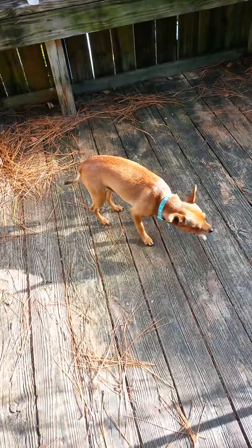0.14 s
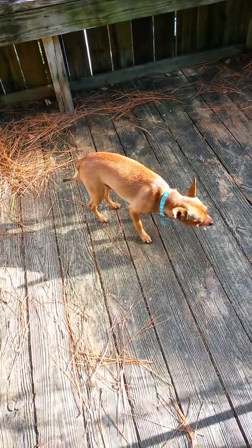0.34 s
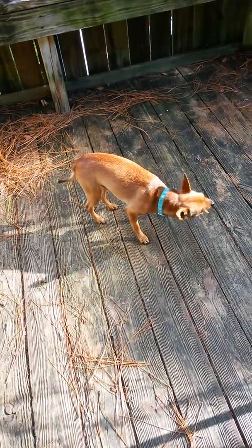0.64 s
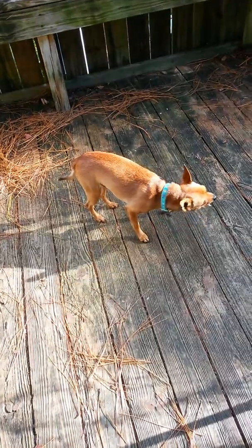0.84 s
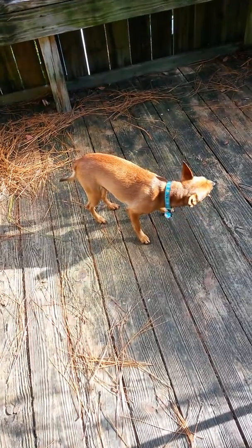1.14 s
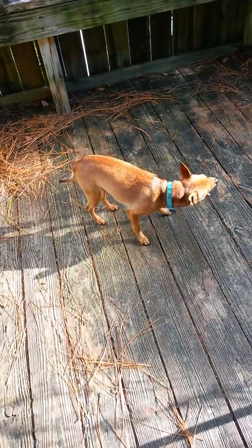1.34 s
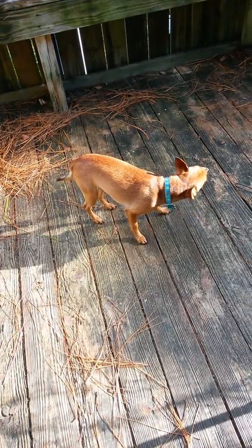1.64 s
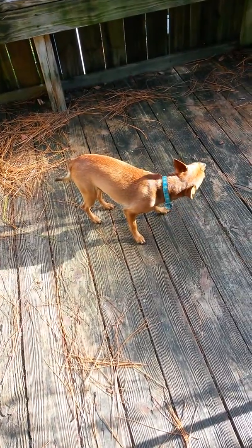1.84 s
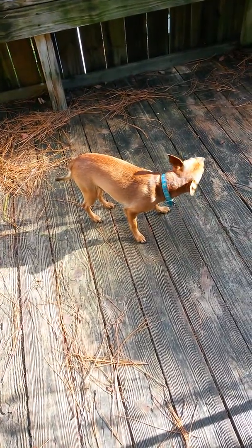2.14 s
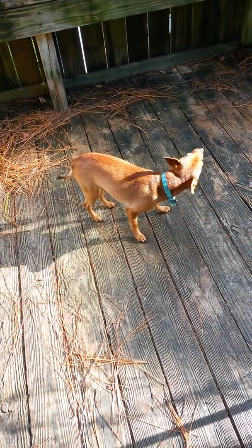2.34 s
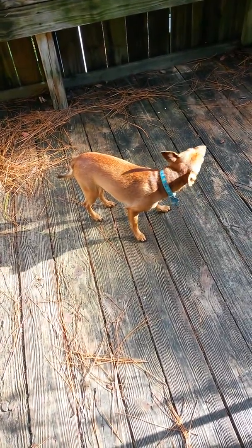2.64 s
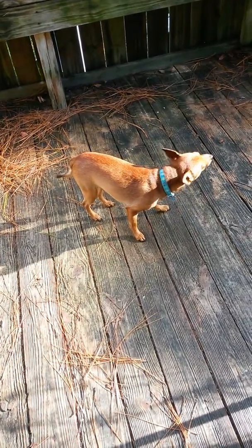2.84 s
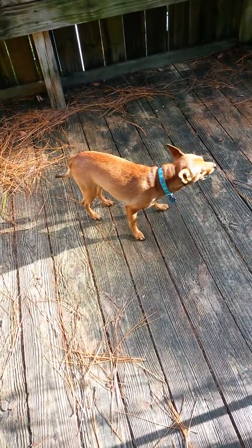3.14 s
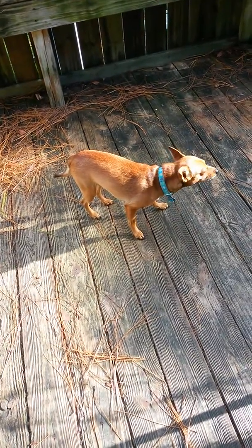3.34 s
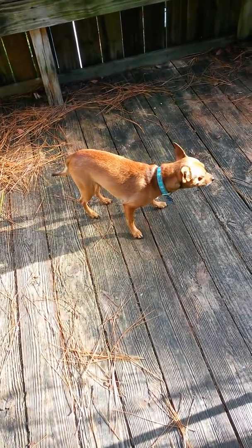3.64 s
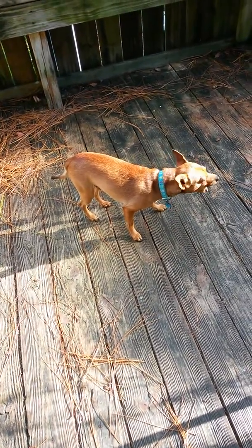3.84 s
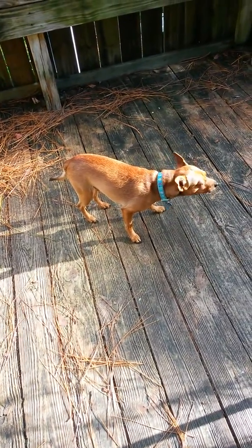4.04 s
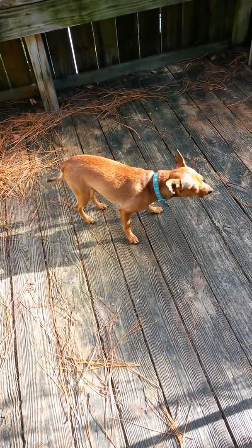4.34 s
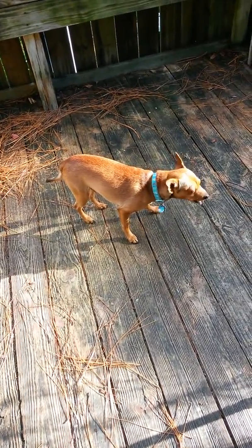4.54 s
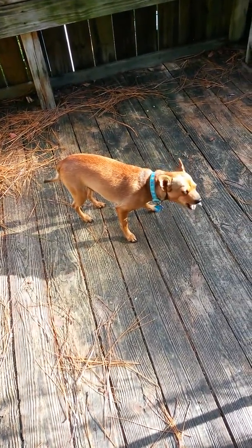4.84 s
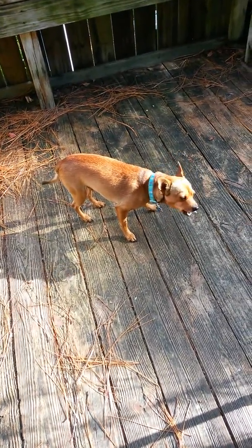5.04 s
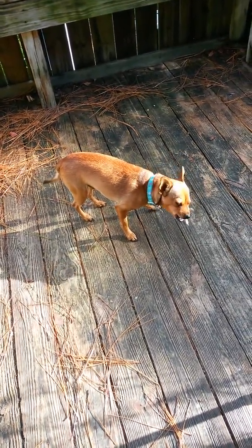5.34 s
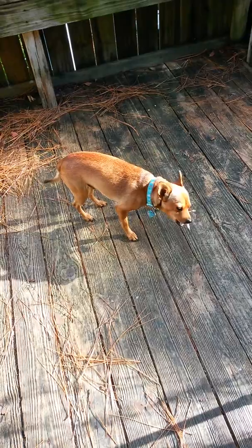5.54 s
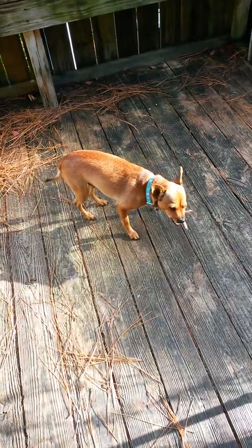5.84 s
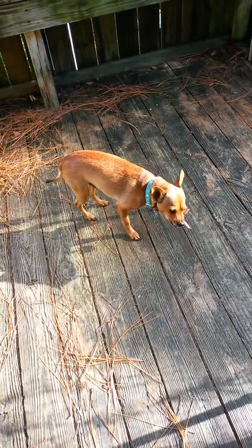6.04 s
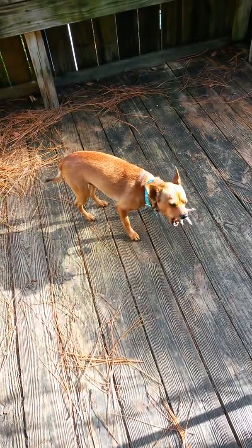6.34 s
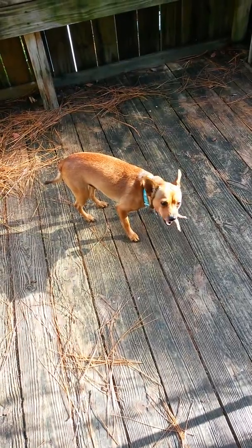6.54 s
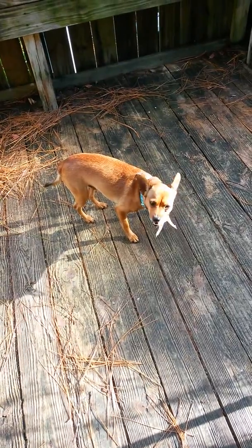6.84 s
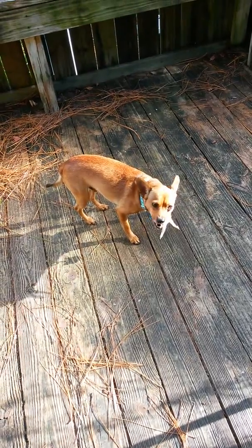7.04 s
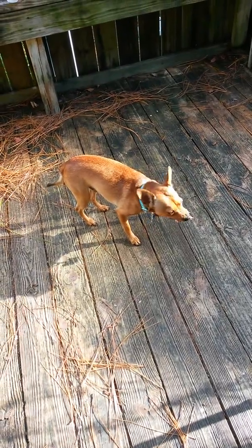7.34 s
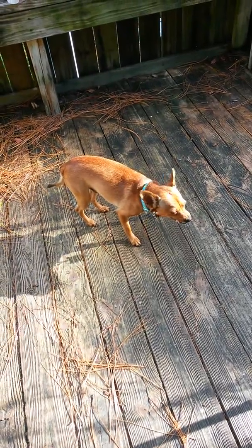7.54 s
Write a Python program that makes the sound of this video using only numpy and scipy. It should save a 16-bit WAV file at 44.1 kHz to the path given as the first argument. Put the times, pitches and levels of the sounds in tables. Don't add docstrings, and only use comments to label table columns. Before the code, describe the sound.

Sharp wet bone crunches and bright jingling collar tags from a small dog chewing outdoors, with a quiet stretch midway and faint wind rumble behind.

```python
import sys
import numpy as np
from scipy import signal
from scipy.fft import rfft, irfft, next_fast_len
from scipy.io import wavfile
from scipy.ndimage import uniform_filter1d, map_coordinates

SR = 44100
rng = np.random.default_rng(int(sys.argv[2]) if len(sys.argv) > 2 else 0)


def int16_out(signal):
    q = np.round(np.clip(np.atleast_2d(signal).T, -1, 1) * 32767)
    wavfile.write(sys.argv[1], SR, q.astype(np.int16))


def amplitude_ratio(level_db):
    exponent = np.asarray(level_db, float) / 20
    return 10 ** exponent


N = 339570

# t/s, f/Hz, level/dB
ENGINE_FIRING = [(0, 62.65, -51.5), (1.2, 62.5, -49.5), (1.35, 59.8, -52), (1.72, 58.9, -56),
                 (1.95, 62.5, -51.5), (2.66, 63.53, -50), (2.96, 64, -62), (3.26, 65.77, -53),
                 (3.67, 64.7, -57.5), (3.85, 62.8, -63), (4.07, 65.6, -57.5), (4.84, 65.24, -49.5),
                 (5.6, 65.4, -55), (6.65, 61.8, -58.5), (7.08, 63.2, -69), (7.7, 60.6, -76)]
# t/s, level/dB
ENGINE_LOAD = [(0, -61.5), (1.72, -57), (2.2, -63.5), (3.67, -73), (4.0, -76), (4.84, -68), (6.65, -58),
               (7.08, -53.5), (7.7, -63)]
# f/Hz, level/dB
MAINS_HUM = [(120, -60)]
# t/s, level/dB
WIND_LEVEL = [(0, -56), (1.05, -54), (1.99, -56.5), (2.57, -54.5), (2.87, -58.5), (3.55, -57),
              (3.85, -60.5), (4.2, -58), (4.6, -58), (5.04, -56), (5.92, -56.5), (6.1, -54), (6.2, -57.5),
              (6.7, -57), (6.91, -55.5), (7.7, -58)]
# f/Hz, density/dB per Hz
RUMBLE_SPECTRUM = [(18, -61), (30, -12), (41, -12.5), (64, 2), (91, 1), (108, -2), (140, -5.5), (187, -3.5),
                   (264, -4), (286, -9), (700, -20.5), (910, -66), (1540, -120)]
# f/Hz, density/dB per Hz
RUSTLE_SPECTRUM = [(240, -60), (400, -7), (495, -7), (660, -9), (780, -7.5), (880, -8.5), (2870, -18),
                   (5950, -19), (7580, -22.5), (13300, -22.5), (15000, -26)]
# f/Hz, correlation/1
PORT_LIKENESS = [(60, 0.92), (150, 0.95), (380, 0.62), (950, -0.22), (2380, 0.052), (5980, 0.0095),
                 (15000, 0.023)]
RUSTLE_DB, RUSTLE_FOLLOWS = -63, 0.82

# f/Hz, t60/s
FENCE_T60 = [(500, 0.031), (3000, 0.041), (12000, 0.031)]
# f/Hz, gain/dB
BODY_SHADOW = [(1000, 1), (2400, -1), (4400, -5), (8000, -11), (15000, -16)]
# f/Hz, lag/rad
BODY_LAG = [(0, 0), (1800, .8), (3100, 1.4), (5430, 6.5), (7150, 11.4), (9560, 19.7), (11900, 24.3),
            (16000, 33)]
# t/s, share/1
MUZZLE_TURN = [(0, 0), (5.9, 0), (5.93, 1), (7.4, 1), (7.44, 0), (7.7, 0)]
TURN_LAG_SAMPLES = 7

# f/Hz, level/dB, share of t60/1
THIN_MODES = [(11863, 0, 1.2), (12015, -3, .75)]
# f/Hz, level/dB, share of t60/1
THICK_MODES = [(10425, 0, 1.05), (10530, -6, .7), (8600, -18, .8)]
# f/Hz, level/dB, share of t60/1
SPLIT_RING_MODES = [(7300, 0, .6)]
# f/Hz, level/dB, share of t60/1
BUCKLE_MODES = [(13950, 0, .7), (8200, -5, .6)]
# t/s, click level/dB, thin level/dB, thick level/dB, t60/s
TAG_KNOCKS = [(.486, -22.5, -42.5, -46, 0.1), (.57, -40, -52, -52, .08), (.768, -42, -46.5, -47, 0.075),
              (0.9209, -24, -43, -56, 0.085), (.999, -30, -46, -43.5, 0.046), (1.127, -26.5, -47, -59, .1),
              (1.17, -25, -37.5, -48, 0.057), (1.311, -28, -41, -54, 0.086),
              (1.3885, -28, -44, -41.5, 0.057), (1.465, -38, -59, -56, .09), (1.606, -37, -44, -42, .042),
              (1.63, -29, -44, -42, .05), (2.0515, -29, -48, -62, 0.067), (2.3258, -31, -52, -48, 0.068),
              (2.3518, -30, -48, -49, 0.054), (2.967, -31, -44, -51, 0.079), (3.0, -30, -55, -62, 0.048),
              (3.381, -40, -53.5, -57, 0.11), (4.763, -33, -53, -47, 0.059), (5.0247, -30, -42, -50, 0.088),
              (5.0722, -28, -51, -40, .06), (6.912, -32, -47.5, -53, .09), (7.0205, -31, -57, -64, .1),
              (7.483, -31, -47.5, -60, 0.068)]
# t/s, click level/dB, ring level/dB
THIN_TAG_TAPS = [(.26, -55, -64), (.425, -55, -67), (.6565, -46, -47), (.735, -45, -50), (1.1464, -45, -49),
                 (1.35, -55, -59), (1.4385, -47, -55), (1.4845, -50, -55), (1.645, -50, -49),
                 (1.726, -42, -57), (1.79, -60, -70), (1.815, -60, -70), (1.84, -60, -71),
                 (1.9445, -54, -61), (2.1925, -51, -54), (2.556, -48, -51), (2.572, -57, -52),
                 (2.722, -39, -55), (2.9005, -54, -65), (3.368, -55, -65), (3.541, -39, -52),
                 (4.2745, -34, -51), (4.401, -55, -65), (4.9185, -35, -55.5), (5.1785, -35, -52),
                 (5.3446, -55, -59), (5.54, -60, -69), (5.5814, -50, -63), (5.5897, -55, -63),
                 (5.684, -60, -66), (5.705, -60, -66), (5.8511, -36, -57), (5.9364, -55, -59),
                 (5.9838, -55, -61), (6.802, -48, -49.5), (7.025, -55, -54), (7.04, -55, -52),
                 (7.1165, -59, -62), (7.2724, -54, -57), (7.3372, -47, -54), (7.52, -58, -59),
                 (7.5767, -50, -59), (7.692, -55, -58)]
# t/s, click level/dB, ring level/dB
BOTH_TAG_TAPS = [(.3087, -51, -60), (.37, -46, -60), (.4685, -45, -72), (2.466, -38, -63),
                 (2.5345, -40, -50), (2.608, -55, -65), (3.2502, -38, -61), (3.416, -33, -60),
                 (4.138, -37, -59.5), (5.097, -45, -55), (7.435, -62, -68)]
# t/s, click level/dB, ring level/dB
THICK_TAG_TAPS = [(.133, -28, -56), (.505, -55, -44), (.52, -55, -46), (.7008, -50, -62), (.9814, -44, -47),
                  (2.066, -48, -56), (5.0832, -44, -48), (5.3925, -45, -50), (5.4415, -51, -54),
                  (5.4755, -48, -52), (5.945, -60, -61), (5.975, -60, -58), (6.923, -55, -50),
                  (7.345, -60, -54), (7.413, -60, -62)]
# t/s, level/dB
SPLIT_RING_HITS = [
    (.487, -56),
    (.9215, -46.5),
    (1.127, -43.5),
    (1.312, -49),
    (1.607, -54),
    (2.327, -53),
    (2.967, -62),
    (3.381, -52.5),
    (5.0245, -42.5),
    (6.912, -56),
]
# t/s, level/dB
BUCKLE_KNOCKS = [
    (.333, -60),
    (1.4385, -55),
    (1.472, -53),
    (1.645, -63),
    (2.896, -55.5),
    (2.949, -61),
]
# start t/s, stop t/s, start level/dB
TAG_SINGING = [(0, .045, -83), (0.375, 0.49, -69), (0.473, 0.54, -68), (0.564, 0.61, -68),
               (0.656, 0.76, -53.5), (0.927, 0.994, -60.5), (1.007, 1.124, -59), (1.318, 1.384, -63),
               (1.388, 1.462, -56.5), (1.947, 2.062, -66), (2.195, 2.367, -74), (2.724, 2.819, -73),
               (3.244, 3.271, -72), (3.41, 3.471, -59), (3.543, 3.565, -67), (4.271, 4.341, -72),
               (4.92, 5.02, -70), (5.025, 5.12, -66), (5.174, 5.269, -72), (5.364, 5.439, -74),
               (5.444, 5.469, -66), (5.473, 5.533, -69), (5.85, 5.969, -67), (6.8, 6.905, -59.5),
               (7.018, 7.07, -63), (7.272, 7.335, -73), (7.336, 7.365, -65), (7.475, 7.541, -70)]
SING_HZ, SING_FADE_DB_PER_S = 7059, 76
TAP_T60_S = 0.069
SILENT_TAG_DB = -19
SMALL_CLICK_DB = 20.5

# t/s, peak level/dB, f/Hz
JAW_THUDS = [
    (6.0425, -38, 400),
    (2.1372, -40.5, 1070),
    (2.0345, -43, 1180),
    (6.797, -37.5, 2100),
    (5.487, -47.5, 1530),
    (2.569, -46.5, 1650),
]
# start t/s, stop t/s, level/dB, colour f/Hz
GRISTLE_GRINDS = [(0.278, 0.397, -63.5, 4960), (0.484, 0.55, -60, 4370), (0.568, 0.598, -61, 3020),
                  (0.602, 0.626, -58, 1830), (0.631, 0.65, -55, 2600), (0.674, 0.826, -57, 5000),
                  (0.911, 1.064, -60.5, 5000), (1.121, 1.247, -62, 4625), (1.374, 1.512, -60.5, 4970),
                  (1.527, 1.555, -57, 5000), (1.569, 1.644, -60.5, 4300), (1.657, 1.705, -55, 3620),
                  (2.05, 2.093, -59.5, 4540), (2.122, 2.155, -60, 4280), (2.317, 2.419, -63, 4626),
                  (2.561, 2.621, -61, 4700), (2.9, 3.035, -72, 3960), (3.367, 3.448, -67, 4650),
                  (3.982, 4.121, -68, 5000), (4.749, 4.859, -69, 4490), (5, 5.149, -63, 4250),
                  (5.299, 5.419, -62.5, 3950), (5.468, 5.526, -56, 4200), (5.539, 5.575, -62, 4270),
                  (5.599, 5.726, -67, 4540), (5.93, 6.14, -62.5, 4330), (6.454, 6.527, -61.5, 4510),
                  (6.779, 6.854, -60, 4490), (6.897, 7.042, -57.5, 3700), (7.096, 7.225, -65.5, 4340),
                  (7.457, 7.543, -58, 3265)]
FIZZ_DB_PER_OCTAVE = 12

# t/s, peak level/dB, mouth f/Hz, snap level/dB
BONE_BREAKS = [(.0507, -42, 3200, -51), (.5033, -53, 3940, -43), (.5592, -33.5, 1910, -44),
               (.6001, -24, 1810, -50), (.6308, -39, 4400, -54), (.769, -44, 3800, -54),
               (.9165, -39, 4500, -61), (1.02, -48, 5600, -65), (1.0255, -33, 5440, -67),
               (1.03, -45, 5600, -67), (1.0445, -42, 5500, -66), (1.1692, -35, 3900, -63),
               (1.208, -42, 5530, -62), (1.212, -43, 3200, -62), (1.5303, -29, 4560, -55),
               (1.5705, -39, 4300, -66), (1.5718, -30.5, 4400, -63), (1.6665, -40, 5000, -62),
               (1.672, -33, 2600, -52), (1.6725, -33.5, 5400, -53), (2.0515, -46, 1960, -62),
               (2.135, -43, 3720, -68), (2.1375, -34.5, 4200, -67), (2.1425, -44, 3500, -66),
               (2.5685, -35, 5500, -54), (2.571, -32.5, 4600, -56), (2.575, -34.5, 4500, -64),
               (5.3842, -43, 3470, -54), (5.4738, -41, 5200, -60), (5.4868, -28.5, 3570, -47),
               (6.0418, -27.5, 4850, -62), (6.076, -33, 3300, -64), (6.83, -43, 4650, -50),
               (7.5076, -38, 3080, -62)]
# t/s, peak level/dB, mouth f/Hz
SMALL_TICKS = [(.119, -61, 5470), (0.33, -54, 5950), (.372, -44, 4470), (0.6908, -40, 1730),
               (.8613, -49, 5250), (0.889, -52, 5450), (3.75, -53, 4600), (3.915, -49.5, 4100),
               (5.0122, -49, 5050), (5.097, -45, 3310), (5.5522, -44, 3200), (5.636, -44, 5540),
               (5.6937, -40, 2040), (5.9568, -40, 4160), (5.9658, -48, 5400), (5.9853, -44, 3356),
               (6.1131, -45, 3460), (6.3669, -47, 3158), (6.492, -42, 5400), (6.793, -53, 3500),
               (6.817, -52, 4200), (7.001, -55, 4000), (7.262, -49, 1775), (7.286, -47, 3507),
               (7.526, -46, 3550),
               (.4905, -46, 4000), (.577, -49, 6500), (.704, -54, 5200), (.721, -56, 5500),
               (.734, -52, 5000), (.745, -55, 4500), (.776, -45, 5600), (.803, -48, 4500),
               (.981, -54, 4500), (1.351, -56, 4500), (1.427, -55, 5000), (1.444, -50, 4600),
               (1.604, -52, 4200), (1.62, -59, 4800), (1.681, -51, 3300), (2.352, -49, 5200),
               (2.393, -59, 4800), (5.028, -48, 5000), (5.0725, -49, 4700), (5.132, -53, 5000),
               (5.321, -47, 3300), (5.392, -52, 5480), (5.494, -51, 5000), (5.499, -49, 3300),
               (5.508, -51, 3200), (5.516, -52, 3100), (5.546, -58, 5170), (5.6, -57, 6000),
               (5.607, -56, 4600), (5.685, -56, 5500), (5.695, -55, 3404)]
# t/s, snap level/dB
BRIGHT_CRACKS = [
    (.743, -63),
    (1.4424, -54),
    (4.756, -53),
    (4.829, -44.5),
    (5.321, -61),
    (5.627, -51),
    (5.7868, -45.5),
    (6.1644, -65),
    (7.2489, -57),
    (7.601, -50),
]
TICK_SNAP_DB, SNAP_BODY_DB, SNAP_BODY_HZ = -9, -8, 5000
WALL_HZ = 4200
DECK_S, DECK_DB, POST_S, POST_DB = .00082, 4, .0062, -9


def unit(x):
    return x / np.sqrt(np.mean(x ** 2) + 1e-20)


def along(points, hz):
    f, v = np.transpose(points)
    return np.interp(np.log(hz + 1), np.log(f + 1), v)


def curves(rows):
    s, *cols = np.transpose(rows)
    return [np.interp(np.arange(N) / SR, s, c) for c in cols]


def wobble(rate_hz):
    knots = rng.standard_normal(int(N * rate_hz / SR) + 4)
    return map_coordinates(knots, [np.arange(N) * rate_hz / SR])


def filtered(x, response):
    m = next_fast_len(x.shape[-1] + 4096)
    spectrum = rfft(x, m) * response(np.fft.rfftfreq(m, 1 / SR))
    return irfft(spectrum, m)[..., :x.shape[-1]]


def resonance(hz, width_hz):
    return lambda f: 1j * f * width_hz / (hz * hz - f * f + 1j * f * width_hz)


def add(track, s, sound):
    part = track[max(round(s * SR), 0):][:len(sound)]
    part += sound[:len(part)]


def rush(spectrum, patchy_db):
    z = signal.stft(rng.standard_normal((2, N)), nperseg=512)[2]
    field = rng.standard_normal(z.shape[1:])
    field = uniform_filter1d(uniform_filter1d(field, size=5, axis=0), size=12, axis=1)
    pair = signal.istft(z * amplitude_ratio(patchy_db * unit(field)), nperseg=512)[1][:, :N]

    def mid_side_gain(hz):
        angle = np.arccos(np.clip(along(PORT_LIKENESS, hz), -1, 1)) / 2
        return amplitude_ratio(along(spectrum, hz)) * [np.cos(angle), np.sin(angle)]

    mid, side = filtered(pair, mid_side_gain)
    return unit(np.array([mid + side, mid - side]))


def engine_and_hum():
    (firing_hz, first_db), (third_db,) = curves(ENGINE_FIRING), curves(ENGINE_LOAD)
    phase = 2 * np.pi * np.cumsum(firing_hz) / SR
    drone = amplitude_ratio(first_db + 1.5 * wobble(9)) * np.sin(phase + .85 * wobble(14))
    drone += amplitude_ratio(third_db - 5.5 + 2.5 * wobble(8)) * np.sin(3 * phase + 1.1 * wobble(12))
    for hz, db in MAINS_HUM:
        hum_phase = 2 * np.pi * hz * np.arange(N) / SR + 0.16 * wobble(6.9)
        drone += amplitude_ratio(db + 3.04 * wobble(7)) * np.sin(hum_phase)
    return drone


def wind():
    rumble_db, = curves(WIND_LEVEL)
    rustle_db = RUSTLE_DB + RUSTLE_FOLLOWS * (rumble_db - rumble_db.mean())
    rumble = amplitude_ratio(rumble_db + 4 + 0.8 * wobble(4.92)) * rush(RUMBLE_SPECTRUM, patchy_db=0.5)
    rustle = amplitude_ratio(rustle_db + 4.5 + 0.084 * wobble(2.33)) * rush(RUSTLE_SPECTRUM, patchy_db=1.1)
    return amplitude_ratio([[.6], [-.6]]) * rumble + rustle


def yard():
    return np.sqrt(2) * engine_and_hum() + wind()


def fence(x):
    hz, t, z = signal.stft(rng.standard_normal((2, SR // 5)), SR, nperseg=128)
    decay = amplitude_ratio(-60 * t / along(FENCE_T60, hz)[:, None])
    tail = signal.istft(z * decay, SR, nperseg=128)[1]
    delayed = np.pad(x, (200, 0))[None]
    return signal.fftconvolve(delayed, tail / np.linalg.norm(tail[0]), axes=1)[:, :N]


def touches():
    kinds = ((THIN_TAG_TAPS, 0, SILENT_TAG_DB), (BOTH_TAG_TAPS, 0, 0), (THICK_TAG_TAPS, SILENT_TAG_DB, 0))
    taps = [(s, click_db, db + thin_db, db + thick_db, TAP_T60_S)
            for rows, thin_db, thick_db in kinds for s, click_db, db in rows]
    return sorted(taps + TAG_KNOCKS)


def clink(click_db, parts, t60_s, gap_s):
    t = np.arange(SR // 6) / SR
    click = amplitude_ratio(click_db - 6 - 60 * t / .007) * rng.standard_normal(len(t))
    ring = filtered(click, resonance(8500, 10000))
    damped_db = 60 * np.maximum(t - gap_s, 0) / 0.023
    onset_db = 9 * np.exp(-t / 0.0008)
    for db, modes in parts:
        chatter_db = 2.9 * unit(uniform_filter1d(rng.standard_normal(len(t)), size=200))
        for hz, mode_db, share in modes:
            off_hz, off_db = rng.standard_normal(2) * [18, 1.5]
            fade_db = 60 * t / (share * max(t60_s, .02)) + damped_db + onset_db
            level_db = db + 8.0 + mode_db + off_db + chatter_db - fade_db
            ring += amplitude_ratio(level_db) * np.sin(2 * np.pi * (hz + off_hz) * t)
    return ring


def singing_tag():
    out = np.zeros(N)
    for start, stop, db in TAG_SINGING:
        t = np.arange(round((stop - start) * SR)) / SR
        edges = np.clip(np.minimum(t / 0.00089, (t[-1] - t) / 0.0056), 0, 1)
        tone = np.sin(2 * np.pi * SING_HZ * t)
        add(out, start, edges * amplitude_ratio(9 + db - SING_FADE_DB_PER_S * t) * tone)
    return out


def tags():
    out = singing_tag()
    events = touches()
    gaps_s = np.diff(np.append(np.transpose(events)[0], N / SR))
    for (s, click_db, thin_db, thick_db, t60_s), gap_s in zip(events, gaps_s):
        parts = ((thin_db, THIN_MODES), (thick_db, THICK_MODES))
        add(out, s, clink(click_db, parts, t60_s, gap_s))
    for hits, modes in ((SPLIT_RING_HITS, SPLIT_RING_MODES), (BUCKLE_KNOCKS, BUCKLE_MODES)):
        for s, db in hits:
            add(out, s, clink(db + SMALL_CLICK_DB, [(db, modes)], TAP_T60_S, 1))
    return out


def jaw():
    out, t = np.zeros(N), np.arange(SR // 12) / SR
    for s, db, hz in JAW_THUDS:
        puff = rng.standard_normal(len(t)) * amplitude_ratio(-60 * t / .045)
        knock = filtered(puff, lambda f: resonance(hz, .7 * hz)(f) ** 2)
        add(out, s, amplitude_ratio(db) * knock / abs(knock).max())
    return out


def gristle():
    out = np.zeros(N)
    for start, stop, db, hz in GRISTLE_GRINDS:
        size = round((stop - start) * SR)
        draw = rng.random((size // 30, 3))
        place = (draw[:, :1] * size).astype(int) + np.arange(128)
        cycles = hz * np.exp(.7 * (draw[:, 1:2] - .5)) * np.arange(128) / SR
        shape = np.sin(2 * np.pi * cycles) * cycles * np.exp(-cycles / 1.7)
        strength = amplitude_ratio(-4 * np.log(draw[:, 2:] + 0.0064))
        crackle = unit(np.bincount(place.ravel(), (strength * shape).ravel()))
        fizz = unit(filtered(rng.standard_normal(len(crackle)), resonance(5600, 5800)))
        fizz_db = 2.0 + FIZZ_DB_PER_OCTAVE * np.log2(hz / 4600)
        window = signal.windows.tukey(len(crackle), .5)
        add(out, start, amplitude_ratio(db) * (crackle + amplitude_ratio(fizz_db) * fizz) * window)
    return out


def cracks():
    ticks = [(s, db, hz, db + TICK_SNAP_DB) for s, db, hz in SMALL_TICKS]
    brights = [(s, db + SNAP_BODY_DB, SNAP_BODY_HZ, db) for s, db in BRIGHT_CRACKS]
    return BONE_BREAKS + ticks + brights


def bone():
    out, t = np.zeros(N), np.arange(SR // 20) / SR
    for s, db, hz, snap_db in cracks():
        chance = rng.standard_normal((3, len(t)))
        deck_s = DECK_S * (1 + .08 * chance[1, 0])

        def paths(f):
            deck = amplitude_ratio(DECK_DB) * np.exp(-2j * np.pi * f * deck_s)
            post = amplitude_ratio(POST_DB) * np.exp(-2j * np.pi * f * POST_S)
            return 1 + deck + post

        splinters = chance[0] * (chance[1] > 1.3) * amplitude_ratio(-21 - 60 * t / .075)
        burst = chance[2] * amplitude_ratio(-17 - 60 * t / .004)
        force = filtered((t == 0) + burst + splinters, paths)
        wall_hz = np.sqrt(hz * WALL_HZ)
        cavity, bone_wall = resonance(hz, .2 * hz), resonance(wall_hz, 1.6 * wall_hz)
        body = filtered(force, lambda f: (.8 * cavity(f) + bone_wall(f)) * bone_wall(f))
        snap = filtered(force, lambda f: resonance(7800, 8500)(f) ** 2)
        add(out, s, amplitude_ratio(db + 6) * body / abs(body).max() + amplitude_ratio(snap_db + 15) * snap / abs(snap).max())
    return out


def scene():
    mouth, collar = bone() + jaw() + gristle(), tags()
    dog, (swung,) = mouth + collar, curves(MUZZLE_TURN)

    def far_port(hz):
        lag_rad = np.interp(hz, *np.transpose(BODY_LAG))
        return amplitude_ratio(along(BODY_SHADOW, hz)) * np.exp(-1j * lag_rad)

    near_echo, far_echo = amplitude_ratio([[-12], [-4]]) * fence(dog)
    round_body = (1 - swung) * mouth + swung * np.roll(mouth, TURN_LAG_SAMPLES) + collar
    left = filtered(amplitude_ratio(-3.5) * round_body + far_echo, far_port)
    return np.array([left, dog + near_echo]) + yard()


def top_cut(x):
    return signal.sosfilt(signal.butter(12, 15830, fs=SR, output="sos"), x)


def record(dry):
    low_cut = lambda hz: 1 / (1 + (50 / (hz + 1)) ** 7)
    top = lambda hz: np.where(hz < 14550, 1, .02)
    mix = filtered(dry, lambda hz: low_cut(hz) * top(hz))
    return top_cut(mix)


dry = scene()
out = record(dry)
int16_out(out)
```